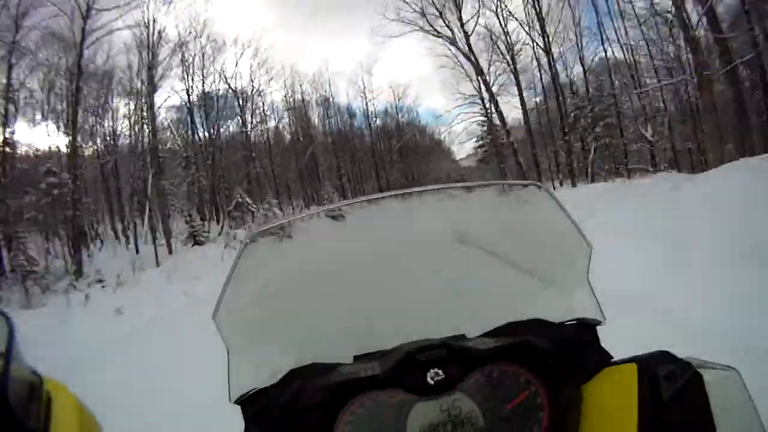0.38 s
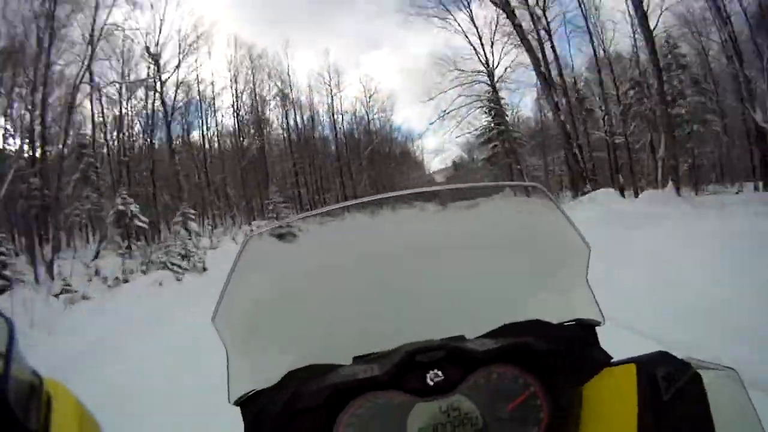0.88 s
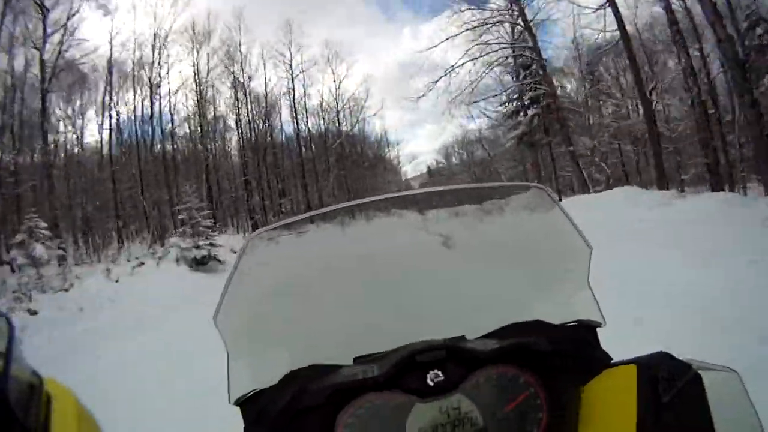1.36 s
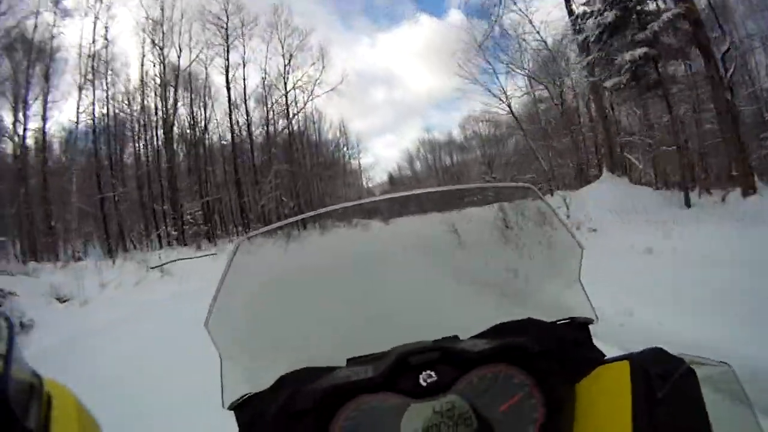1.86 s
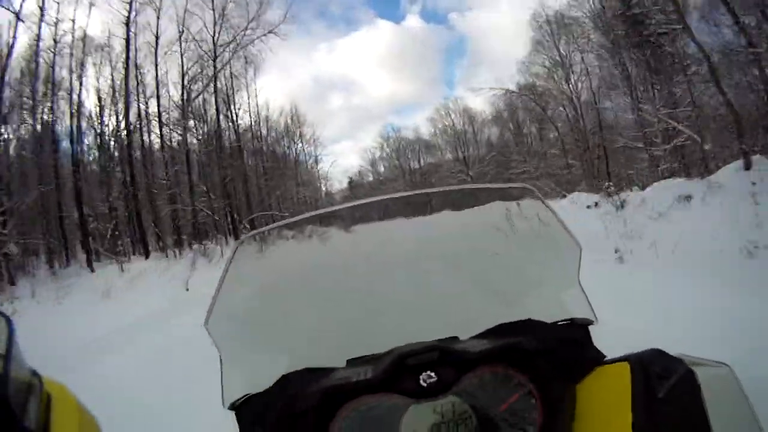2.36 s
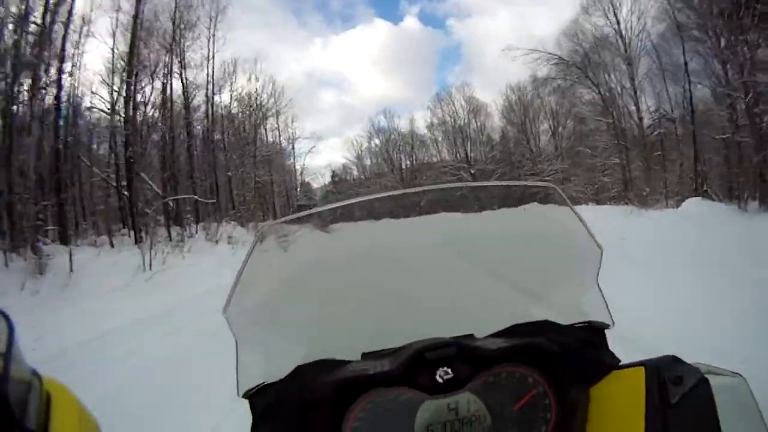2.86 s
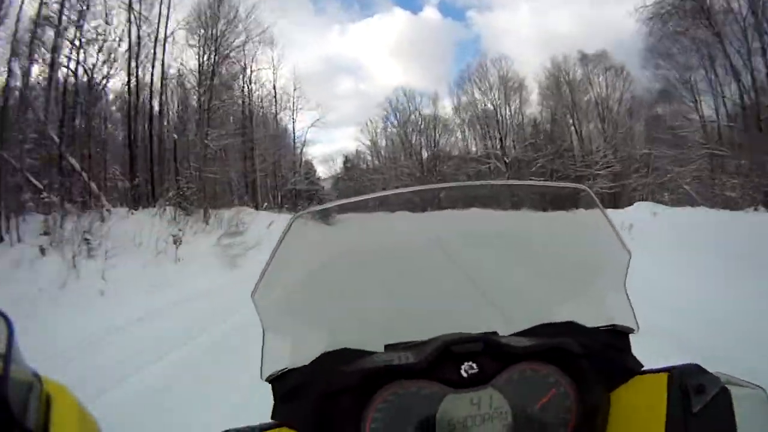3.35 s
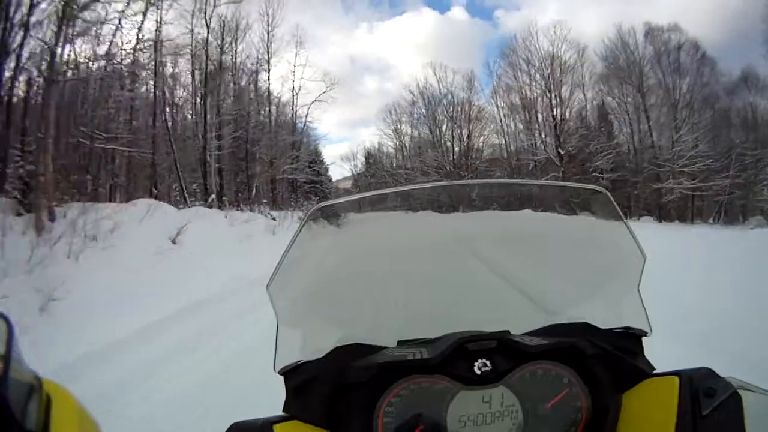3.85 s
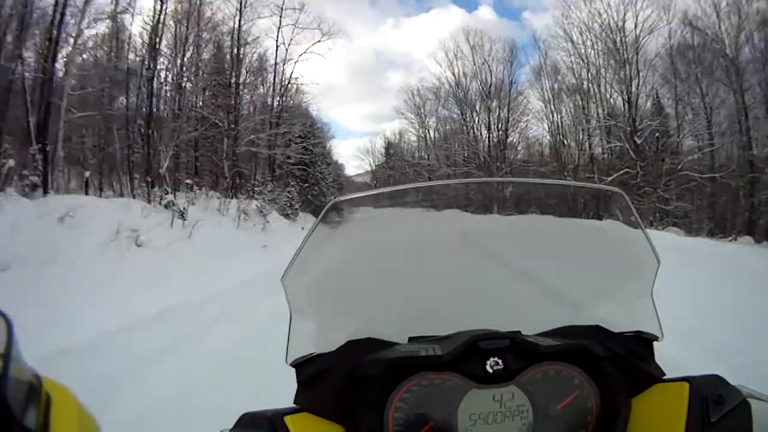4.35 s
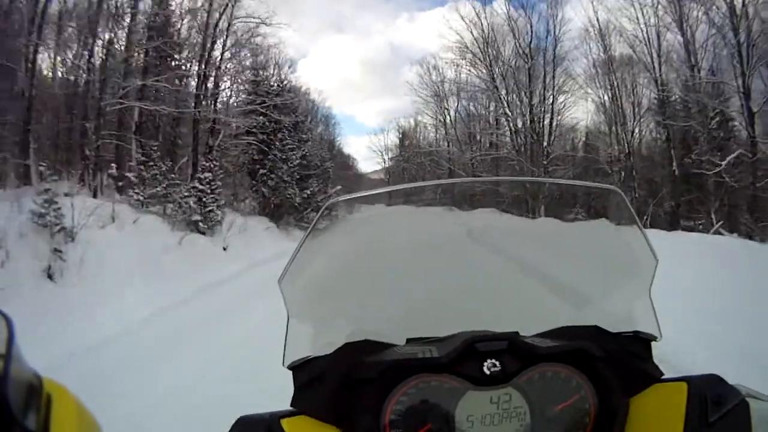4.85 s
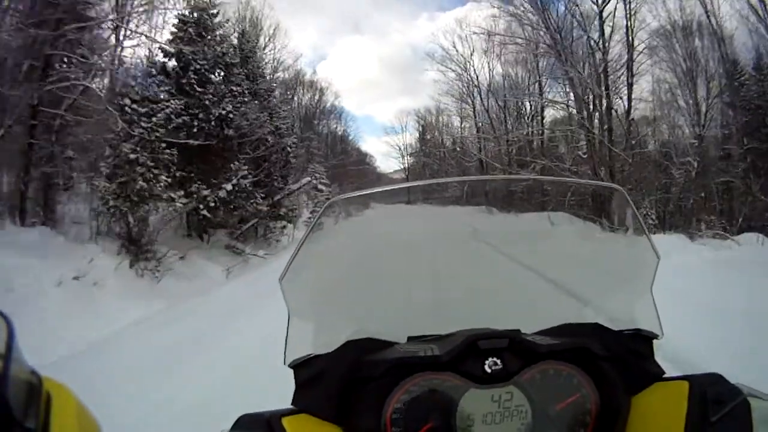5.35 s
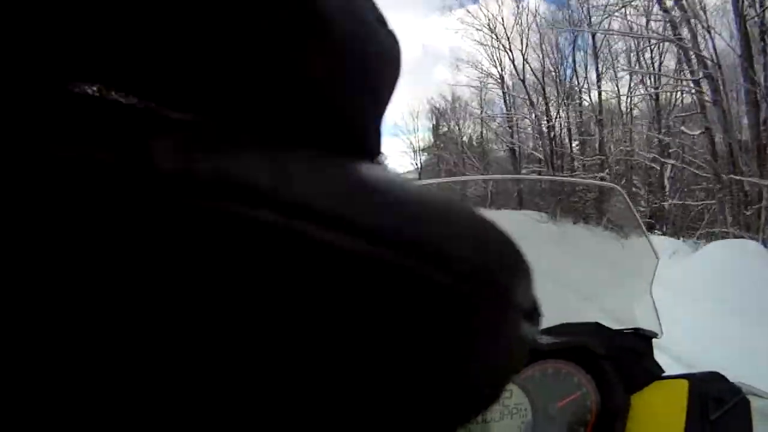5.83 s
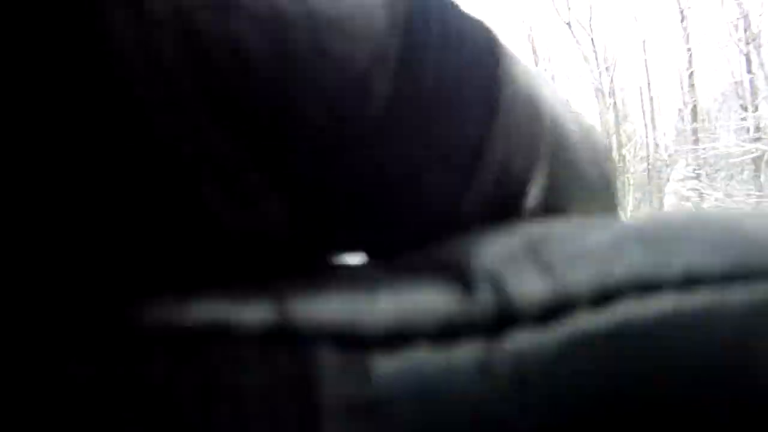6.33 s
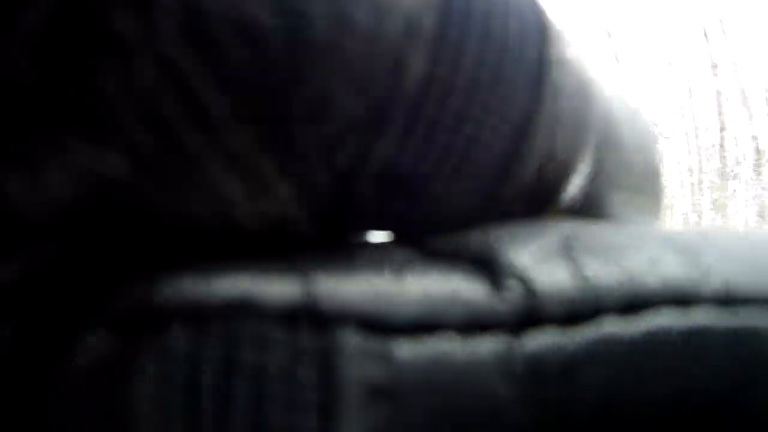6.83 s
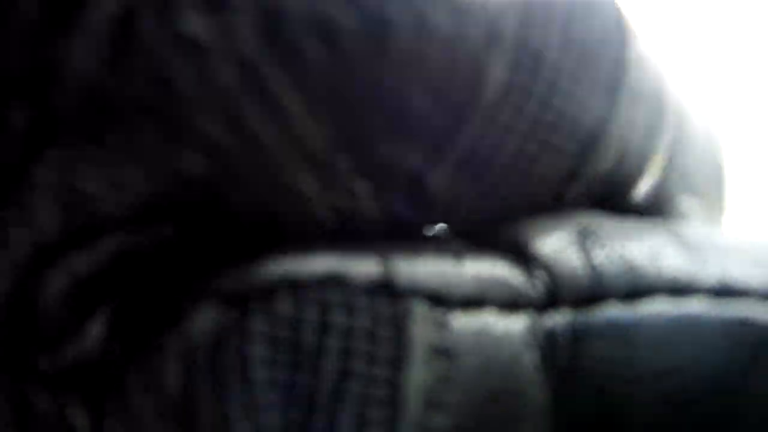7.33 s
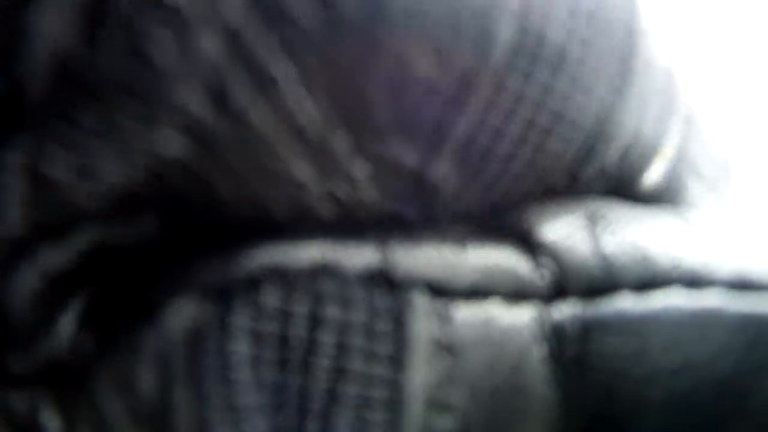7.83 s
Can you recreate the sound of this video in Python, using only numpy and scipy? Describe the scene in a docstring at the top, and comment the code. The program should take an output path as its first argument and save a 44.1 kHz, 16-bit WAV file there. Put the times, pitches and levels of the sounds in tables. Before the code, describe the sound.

Steady snowmobile drone with raspy roar, low wind flutter and clicking case rattle; late on a hand cups the microphone, dulling it, with one hard knock.

```python
"""The hum and roar of a two-cylinder two-stroke snowmobile run throughout, with track, wind and chassis drone.
It cruises on a snow trail; the microphone is in a small camera shut in a plastic case.
Crank and track drive reach it as tones through the mount; shaped noise gives roar, wind and drone.
Blows to resonant modes give the rattle and, late on, the taps of a glove that cups the case; smooth pulses are hard gusts.
The camera's gain yields to peaks, and it holds each low-rate sample, which mirrors the sound into the treble."""
import sys
import numpy as np
from scipy import signal
from scipy.fft import rfft, irfft, next_fast_len
from scipy.io import wavfile
from scipy.ndimage import uniform_filter1d, map_coordinates

SR = 44100
rng = np.random.default_rng(int(sys.argv[2]) if len(sys.argv) > 2 else 0)


def generate_wav(sig):
    """Save sig (samples, or channels by samples) to the path in sys.argv[1] as 16-bit PCM at SR."""
    pcm = np.round(np.clip(np.atleast_2d(sig).T, -1, 1) * 32767).astype(np.int16)
    wavfile.write(sys.argv[1], SR, pcm)


def natural_amplitude(level_db):
    """Convert a level in decibels to a linear amplitude factor, elementwise."""
    exponent = np.asarray(level_db, float) / 20
    return 10 ** exponent


N = 361619
T = np.arange(N) / SR

# Crank rotation: start_s, turns_hz
CRANK_SPEED = [(0, 89.5), (.3, 86.9), (.7, 85), (1.1, 85.5), (1.45, 86.6), (1.72, 84.2), (2.2, 84.9),
               (2.6, 87.7), (3, 89.5), (3.3, 91.2), (3.65, 92.1), (4.1, 90.8), (4.6, 90.4), (4.9, 84.1),
               (5.3, 85.2), (5.9, 84.9), (6.8, 85.9), (8.2, 84.3)]
# How hard the engine pulls: start_s, effort_db (over cruising)
ENGINE_EFFORT = [(0, 1.5), (.35, 1.5), (.55, -1.5), (1.1, -1), (1.45, 0), (1.55, 4), (1.68, 4),
                 (1.78, -1.5), (2.3, -1.5), (2.7, 2), (3.25, 3), (3.5, 0), (3.9, 2), (4.6, 2), (4.75, -2.5),
                 (5.55, -3.5), (6.1, -1.5), (6.8, -1), (7.2, -3), (8.2, -3)]
# Crank harmonics through the mount: multiple, level_db (over the firing level), waver_db
CRANK_HARMONICS = [(1, -0.5, -3), (2, 2, 0), (3, -12.5, 6.5), (4, -17.5, 2), (6, -19, 1)]
# Exhaust overtones as the case passes them: multiple, level_db (over the bark level)
BARK_HARMONICS = [(9, -14), (10, -17), (11, -5), (12, -2), (13, -5), (14, 12), (15, 7), (16, -1), (17, -1),
                  (18, -3), (20, -6), (21, 0), (23, -4)]
# Multiples of the crank rotation that lie on the main case mode
CASE_PEAK_MULTIPLES = (14, 15)
# Levels at cruising [dB], and their growth [dB for each dB of effort]
FIRING_DB, FIRING_GROWS = -29.5, 0.52
BARK_DB, BARK_GROWS, PEAK_GROWS = -45, 1.5, 3
ROAR_LOW_DB, ROAR_HIGH_DB, LOW_GROWS, HIGH_GROWS = -23, -26, 0.55, 0.34

# Share of the case under the glove: start_s, share (0-1)
GLOVE_COVER = [(0, 0), (5.6, 0.1), (6.0, 0.48), (6.9, 0.54), (7.0, 0.63), (8.2, 0.57)]
# Case response to air-borne sound, uncovered: frequency_hz, level_db
OPEN_CASE_RESPONSE = [(290, -55), (500, -28), (650, -34), (1000, -22.5), (1200, -9.5), (1310, 2.5),
                      (1450, -9), (1750, -14), (1950, -6.5), (2040, -9), (2130, -3), (2300, -16.5),
                      (2470, -9.5), (2800, -25.5), (3020, -20.5), (3250, -30), (3560, -17), (3850, -34),
                      (4500, -33.5), (5900, -45), (7000, -120)]
# The same under a glove: frequency_hz, level_db
CUPPED_CASE_RESPONSE = [(290, -32), (500, -7.5), (771, -27.5), (988, -8.5), (1390, -2), (1620, -6),
                        (1690, -14), (1820, -6), (1970, 4.5), (2170, -13), (2530, -2.5), (2750, -20),
                        (3670, -15), (5160, -26), (5900, -35), (7670, -74), (13000, -120)]

# Track drive shaft: start_s, turns_hz, chain_tension_db, snow_hardness_db
TRACK_SHAFT = [(0.0, 84.8, -12, -4.5), (0.5, 83.3, -2.5, 0), (0.9, 81.1, 4.5, -3.5), (1.3, 78.85, 11, 0),
               (1.7, 77.67, 5, 0), (2.2, 75.8, 2, -1), (2.6, 75.36, -6, 0.5), (3.0, 76.12, 8, 1.5),
               (3.4, 76.9, -17, -0.5), (3.8, 78.5, -3, 3), (4.3, 79.4, 6.5, -1), (4.6, 79.33, -2, -3),
               (4.9, 78.34, 1, -3), (5.5, 77.42, -10, -8.5), (6.0, 76.32, 4, -5.5), (6.5, 76.1, 4.5, -6),
               (6.9, 75.08, 5, -2), (7.3, 74.4, -15, -1.5), (8.2, 74.5, -16, -1)]
SPROCKET_TEETH = 17  # of the chain on the shaft
THIRD_DB, FOURTH_DB, WHINE_DB = -23.5, -21.5, -31.5
TUNNEL_HZ, TUNNEL_WIDTH_HZ = 303.1, 5.9  # a chassis resonance that the 4th multiple runs through
GLOVE_DAMPS_DB = -7  # on that resonance, with a hand over the whole case

# Wind buffet: start_s, level_db
WIND_GUSTS = [(0, -17), (1.1, -20.5), (1.7, -25.5), (2.6, -19.5), (3.1, -18.5), (3.6, -21), (4.1, -23),
              (4.6, -17), (5.1, -22), (5.6, -11.5), (6, -25), (8.2, -17.5)]
# Wind on the bare case: frequency_hz, density_db (per Hz)
BUFFET_SPECTRUM = [(10, -49), (20, -20), (30, -13), (38, -4.5), (46, 2), (53, -5.5), (62, -10), (100, -31),
                   (160, -56), (260, -120)]
# Wind round the glove: frequency_hz, density_db (per Hz)
CUPPED_BUFFET_SPECTRUM = [(10, -44), (22, 1), (35, -6.5), (50, -3.5), (70, -7), (95, -8), (130, -25),
                          (260, -120)]
# Chassis over the snow: frequency_hz, density_db (per Hz)
DRONE_SPECTRUM = [(35, -44), (60, -6), (124, -9), (166, -4.5), (243, -5.5), (308, -6.5), (351, -15),
                  (409, -9), (530, -33.5), (572, -37), (800, -26.5), (1040, -66.5), (1760, -120)]
DRONE_DB = -23

# Case modes, three lower then three upper: frequency_hz, width_hz, level_db (for each pass)
CASE_MODES = [(1286, 260, 1), (2035, 474, 0), (2555, 360, -2), (3530, 490, 3), (4670, 570, -2),
              (5340, 440, -4.5)]
LOWER_MODES, UPPER_MODES = CASE_MODES[:3], CASE_MODES[3:]
# The hardest jolts of the case in its mount: start_s, upper_modes_db, lower_modes_db
HARD_JOLTS = [(0.093, -19, -24), (0.5528, -15, -14), (0.632, -24, -18.5), (0.692, -39, -7),
              (1.669, -16, -6), (1.801, -19, -1), (2.194, -37, -11), (2.369, -25, -15), (2.396, -15.5, -1),
              (2.430, -12.5, -3), (2.479, -15, -1.5), (2.533, -35, -16), (2.610, -13, 0.5),
              (2.906, -36, -14.5), (3.107, -36, -12.5), (3.343, -21, -4), (3.396, -22, -9),
              (3.589, -33, -10), (3.7616, -18, -6), (3.944, -23, -9), (4.325, -26, -2.5), (4.733, -9, -9),
              (4.779, -10, -4), (4.894, -25, -3.5), (4.9143, -14, -7), (5.719, -35, -4.5),
              (5.8697, -26, -6), (6.078, -35, -4.5), (6.121, -21, -10), (6.184, -19, 0.5), (6.246, -34, -1),
              (6.3882, -21, -23), (6.5953, -12, -7), (6.6706, -22, -21), (7.401, -24, -5.5),
              (7.937, -31, -8.5), (8.062, -34, -12), (8.127, -33, -9)]
SMALL_JOLTS = 24  # lighter ones, at random times
SMALL_UPPER_DB, SMALL_LOWER_DB, SMALL_SPREAD_DB = -41, -16, 6
JOLT_S, BLOW = 0.0097, 4.9  # chatter falls 30 dB in JOLT_S; first blow over the chatter (ratio)
# Longer rubs of the case on its mount or the glove: start_s, length_s, upper_modes_db, lower_modes_db
CASE_SCRAPES = [(1.654, 0.026, -19, -3.5), (2.417, 0.022, -29, -3), (3.951, 0.032, -30, -7),
                (4.789, 0.044, -13.5, -6), (4.968, 0.018, -22.5, -10), (5.193, 0.05, -30, -5),
                (7.476, 0.02, -15, -10)]
# Single hard gusts on the port: start_s, push_db (peak, before the port leak)
GUST_THUMPS = [(0.748, 1.5), (1.726, -2), (5.699, -5.5), (6.389, -6)]
# Glove on the case: start_s, upper_modes_db, lower_modes_db, thud_db, t60_s
GLOVE_TAPS = [(6.961, 9, 6, 7.5, 0.0057), (7.2926, -2, -25, -17, 0.0028)]
FLAT_HAND = 0.48  # a heavy tap chokes the lowest upper mode: dB lost for each dB of weight
CRACK_DB = -4  # the two highest modes in a tap

HELD_HZ = 12000  # the camera's sampling rate


def unit(x):
    """Normalisation: the signal is scaled to rms 1."""
    return x / np.sqrt(np.mean(x ** 2) + 1e-20)


def along(points, hz):
    """Interpolation of (Hz, value) points on a logarithmic frequency axis."""
    f, v = np.transpose(points)
    return np.interp(np.log(hz + 1), np.log(f + 1), v)


def curves(rows):
    """Linear interpolation in time: one value per sample for each column after the time."""
    s, *cols = np.transpose(rows)
    return [np.interp(T, s, c) for c in cols]


def wobble(rate):
    """Slow fluctuation: a smooth curve through random knots, rate knots a second."""
    knots = rng.standard_normal(int(N * rate / SR) + 4)
    return map_coordinates(knots, [T * rate])


def filtered(x, response):
    """Linear filtering: the spectrum is multiplied by a response of frequency."""
    m = next_fast_len(N + SR // 2)
    return irfft(rfft(x, m) * response(np.fft.rfftfreq(m, 1 / SR)), m)[:N]


def coloured(x, spectrum):
    """Spectral shaping: x weighted by a (Hz, dB) spectrum, at rms 1."""
    return unit(filtered(x, lambda hz: natural_amplitude(along(spectrum, hz))))


def tone(turns, multiple, waver_db, blur, rate):
    """A harmonic of rotation: rms 1 before its level wavers; blur unsteadies the phase in radians."""
    phase = 2 * np.pi * (multiple * turns + rng.random()) + blur * wobble(rate)
    return np.sqrt(2) * natural_amplitude(waver_db * wobble(rate)) * np.sin(phase)


def modes(rows):
    """Modal superposition: a causal sum of resonances with alternating sign."""
    def response(f):
        total = 0
        for k, (centre, width, db) in enumerate(rows):
            total = total + (-1) ** k * natural_amplitude(db) * 1j * f * width / (centre ** 2 - f ** 2 + 1j * f * width)
        return total
    return response


def ring(push, rows):
    """Impulse excitation: a short push through case modes, outer wall then inner, at peak 1."""
    two_walls = modes(rows)(np.fft.rfftfreq(len(push), 1 / SR)) ** 2
    y = irfft(rfft(push) * two_walls, len(push))
    return y / np.abs(y).max()


def covered():
    """Obstruction: the share of the case under the glove."""
    return np.clip(curves(GLOVE_COVER)[0], 0, 1)


def engine():
    """Two transmission paths: low crank harmonics through the mount, bark and roar by air through the case."""
    (hz,), (effort_db,) = curves(CRANK_SPEED), curves(ENGINE_EFFORT)
    turns = np.cumsum(hz) / SR
    hum = sum(natural_amplitude(db) * tone(turns, k, waver, blur=0.53, rate=14) for k, db, waver in CRANK_HARMONICS)
    bark = np.zeros(N)
    for k, db in BARK_HARMONICS:
        grows = PEAK_GROWS if k in CASE_PEAK_MULTIPLES else BARK_GROWS
        overtone = tone(turns, k, waver_db=2.0, blur=.25, rate=4)
        bark += natural_amplitude(BARK_DB + db + grows * effort_db) * overtone
    return natural_amplitude(FIRING_DB + FIRING_GROWS * effort_db) * hum + bark + roar(turns, effort_db)


def roar(turns, effort_db):
    """Modulated noise: it swells with every firing and with effort; two bands shake partly on their own."""
    # the once-a-turn term makes one cylinder louder
    beat = 1 + 0.1 * np.cos(2 * np.pi * turns) + 0.13 * np.cos(4 * np.pi * turns)
    shake_db = 0.5 * wobble(14) + 0.99 * wobble(60) + 1.02 * wobble(4)
    air = rng.standard_normal(N) * beat * natural_amplitude(shake_db)
    cover = covered()
    inside = (1 - cover) * coloured(air, OPEN_CASE_RESPONSE) + cover * coloured(air, CUPPED_CASE_RESPONSE)
    low = filtered(inside, lambda hz: 1 / (1 + (hz / 1620) ** 16))
    low_db = ROAR_LOW_DB + LOW_GROWS * effort_db + 1.16 * wobble(40)
    high_db = ROAR_HIGH_DB + HIGH_GROWS * effort_db + 1.52 * wobble(30)
    return natural_amplitude(low_db) * unit(low) + natural_amplitude(high_db) * unit(inside - low)


def track():
    """Periodic impact: shaft lugs slap the track at multiples of rotation; the chain whines when tight."""
    hz, tension_db, hard_db = curves(TRACK_SHAFT)
    turns = np.cumsum(hz) / SR
    third = tone(turns, 3, waver_db=2.0, blur=0.46, rate=22)
    third += natural_amplitude(-20.5) * tone(turns, 6, waver_db=3.5, blur=0.42, rate=10)
    fourth = tone(turns, 4, waver_db=3.0, blur=0.91, rate=22)
    fourth += natural_amplitude(-17.0) * tone(turns, 5, waver_db=4.5, blur=0.98, rate=26)
    whine = tone(turns, SPROCKET_TEETH, waver_db=2.5, blur=.45, rate=12)
    detuning = 2 * (4 * hz - TUNNEL_HZ) / TUNNEL_WIDTH_HZ
    tunnel = natural_amplitude(GLOVE_DAMPS_DB * covered()) / np.sqrt(1 + detuning ** 2)
    slap = natural_amplitude(THIRD_DB) * third + natural_amplitude(FOURTH_DB) * tunnel * fourth
    return natural_amplitude(hard_db) * slap + natural_amplitude(WHINE_DB + tension_db) * whine


def ride():
    """Turbulence as lumpy low noise, in a wider band once the glove is near; the chassis drones over the snow."""
    buffet_db, = curves(WIND_GUSTS)
    wind, near = rng.standard_normal(N), np.clip(2 * covered(), 0, 1)
    buffet = (1 - near) * coloured(wind, BUFFET_SPECTRUM) + near * coloured(wind, CUPPED_BUFFET_SPECTRUM)
    buffet *= natural_amplitude(2.6 * wobble(8.3))
    drone = coloured(rng.standard_normal(N) * natural_amplitude(1.44 * wobble(30)), DRONE_SPECTRUM)
    return natural_amplitude(buffet_db) * buffet + natural_amplitude(DRONE_DB + 0.99 * wobble(2.477)) * drone


def rattle():
    """Modal excitation: a jolt is a blow and short chatter, a scrape a rub; sharpness rings upper modes, weight lower."""
    out, t = np.zeros(N + SR), np.arange(SR // 10) / SR
    jolts = list(HARD_JOLTS)
    for _ in range(SMALL_JOLTS):
        upper_db = SMALL_UPPER_DB + SMALL_SPREAD_DB * rng.standard_normal()
        lower_db = SMALL_LOWER_DB + SMALL_SPREAD_DB * rng.standard_normal()
        jolts.append((N / SR * rng.random(), upper_db, lower_db))
    for s, sharp_db, heavy_db in jolts:
        burst = np.sign(rng.standard_normal(len(t))) * natural_amplitude(-30 * t / JOLT_S) * (1 - np.exp(-t / .0012))
        burst[SR // 1000] += BLOW
        shell = natural_amplitude(sharp_db) * ring(burst, UPPER_MODES) + natural_amplitude(heavy_db) * ring(burst, LOWER_MODES)
        out[round(s * SR):][:len(t)] += shell
    for s, length, sharp_db, heavy_db in CASE_SCRAPES:
        stroke = np.sqrt(np.sin(np.pi * np.clip(t / length, 0, 1)) + 1e-9)
        slips = 1 + 0.47 * np.sin(2 * np.pi * 65 * t)
        rub = rng.standard_normal(len(t)) * stroke * slips
        shell = natural_amplitude(sharp_db) * ring(rub, UPPER_MODES) + natural_amplitude(heavy_db) * ring(rub, LOWER_MODES)
        out[round(s * SR):][:len(t)] += shell
    return out[:N]


def thumps():
    """Pressure and leakage: a hard gust pushes the membrane once, smoothly; the port lets the pressure leak away."""
    push = sum(-natural_amplitude(db) * np.exp(-((T - s - .006) / 0.0075) ** 2) for s, db in GUST_THUMPS)
    return filtered(push, lambda hz: (1j * hz / (1j * hz + 14)) ** 2)


def taps():
    """Impact: a snap rings the shell over a thud, which is a short push, a longer pull and a slow return."""
    out, t = np.zeros(N + SR), np.arange(SR // 10) / SR
    for s, sharp_db, heavy_db, thud_db, t60 in GLOVE_TAPS:
        share = natural_amplitude(-FLAT_HAND * max(heavy_db - sharp_db + 25, 0))
        snap = np.sign(rng.standard_normal(len(t))) * natural_amplitude(-60 * t / t60) * (1 - np.exp(-t / 0.00025))
        thud = np.sin(np.pi * (t / 0.0019) ** 0.74) * np.exp(-t / 0.0051)
        thud += 0.39 * (t / 0.0039) * np.exp(-t / 0.0066)
        upper = share * ring(snap, UPPER_MODES[:1]) + natural_amplitude(CRACK_DB) * ring(snap, UPPER_MODES[1:])
        shell = natural_amplitude(sharp_db) * upper + natural_amplitude(heavy_db) * ring(snap, LOWER_MODES)
        out[round(s * SR):][:len(t)] += shell + natural_amplitude(thud_db) * thud
    return out[:N]


def scene():
    """Superposition: all sources add at one microphone."""
    steady = engine() + track() + ride() + rattle()
    return (natural_amplitude(0.5) * steady + taps() + thumps())[None]  # the first four are raised by 0.5 dB


def gain_control(x, ceiling_db, release_db_s, attack):
    """Peak limiting: peaks over the ceiling pull the gain down within moments; it climbs back steadily."""
    peak_db = 20 * np.log10(uniform_filter1d(np.abs(x), size=40) + 1e-6)
    needed = np.minimum(ceiling_db - peak_db, 0)
    gain_db = np.minimum.accumulate(needed - release_db_s * T) + release_db_s * T
    lag = max(int(attack * SR), 2)
    return x * natural_amplitude(uniform_filter1d(np.pad(gain_db, (lag, 0), "edge"), size=lag)[:N])


def low_pass(x):
    """Removes everything above the highest recorded frequency."""
    return signal.sosfilt(signal.butter(12, 15670, fs=SR, output="sos"), x)


def record(dry):
    """Zero-order hold: after gain control and soft clipping, each low-rate sample is held for four steps."""
    x = gain_control(dry[0], ceiling_db=-8.5, release_db_s=90, attack=0.0047)
    # the camera's band, 12 to 5400 Hz
    x = filtered(x, lambda hz: hz / np.sqrt((hz ** 2 + 12 ** 2) * (1 + (hz / 5400) ** 16)))
    x = x / (1 + np.abs(x / .96) ** 6) ** (1 / 6)
    held = np.repeat(signal.resample_poly(x, HELD_HZ // 300, SR // 300), 4)
    x = signal.resample_poly(held, SR // 300, 4 * HELD_HZ // 300)[:N]
    mix = np.pad(x, (0, N - len(x)))[None]
    return low_pass(mix)


dry = scene()
out = record(dry)
generate_wav(out)
```